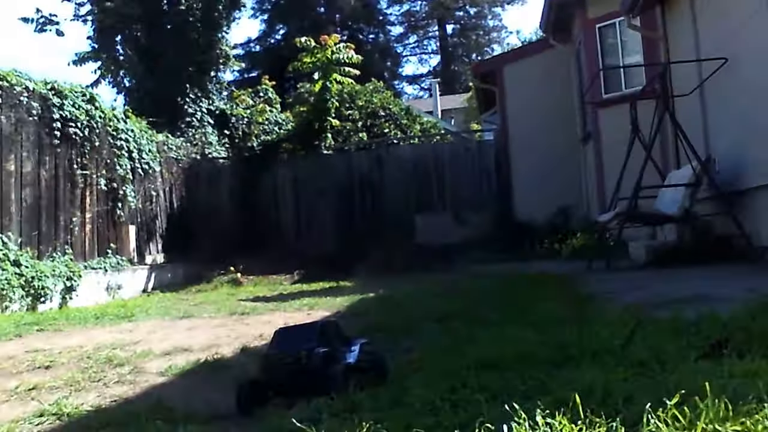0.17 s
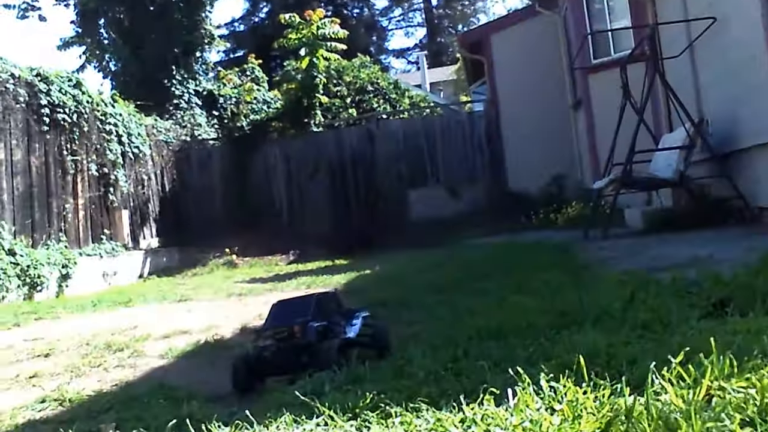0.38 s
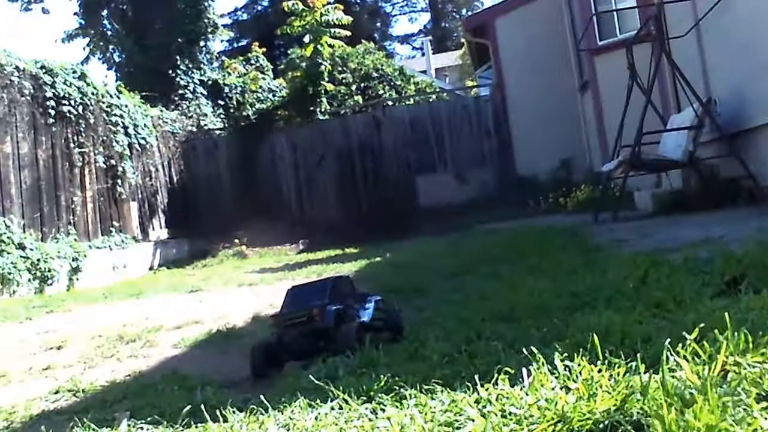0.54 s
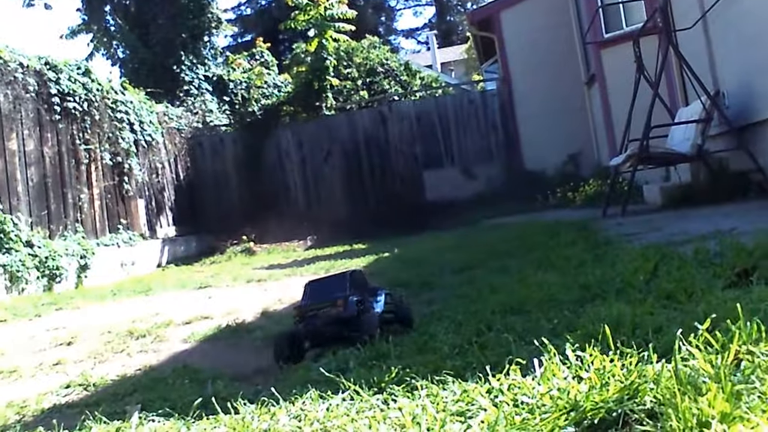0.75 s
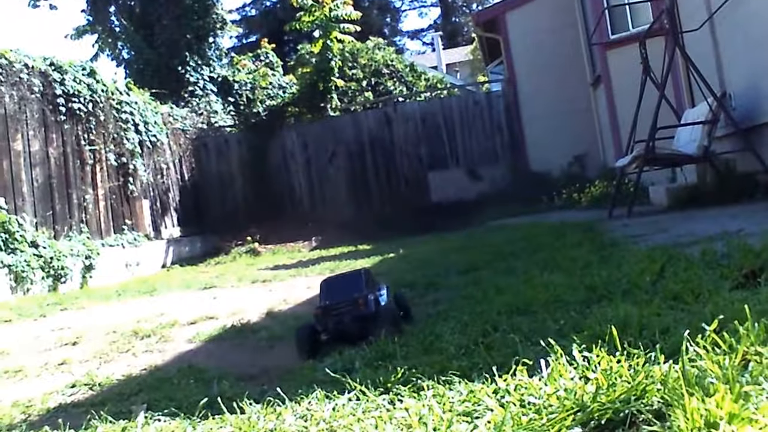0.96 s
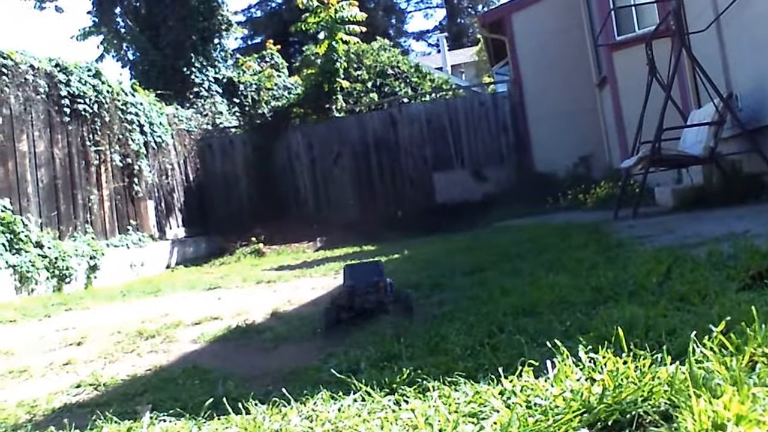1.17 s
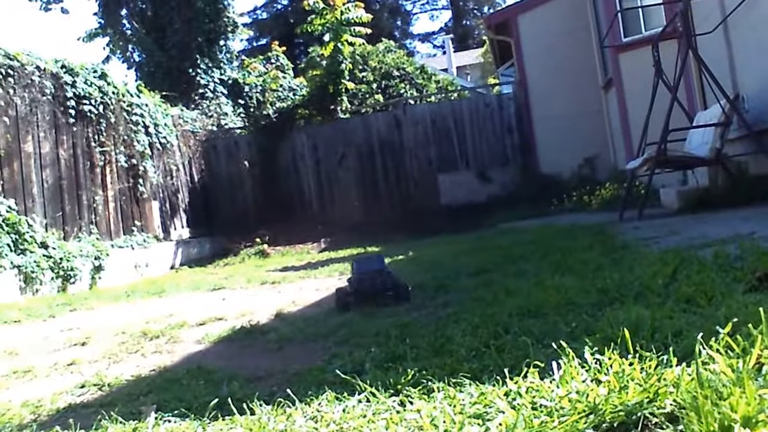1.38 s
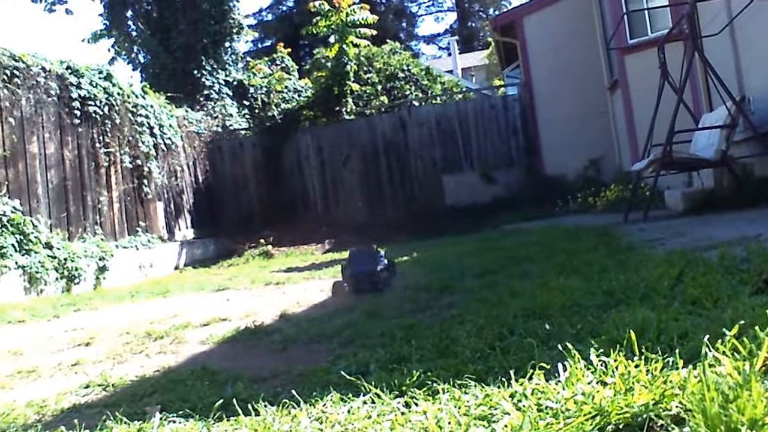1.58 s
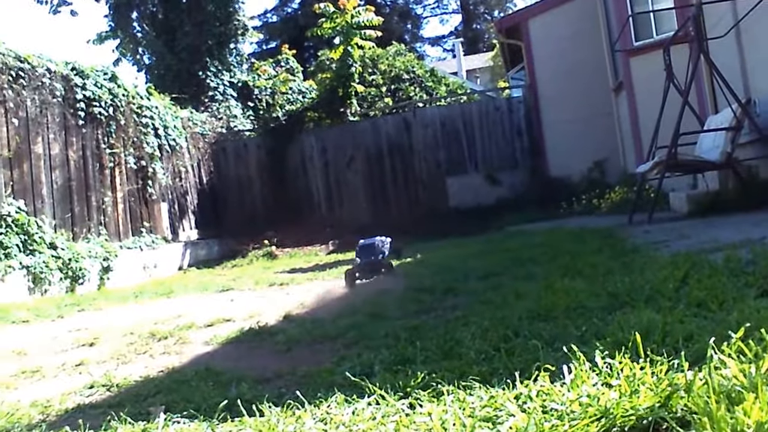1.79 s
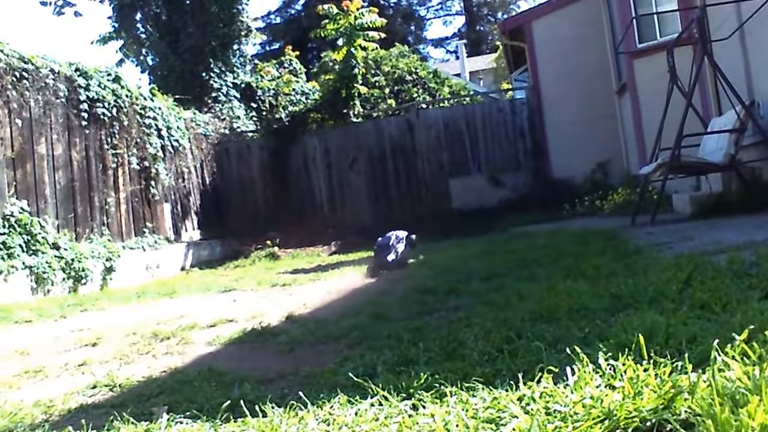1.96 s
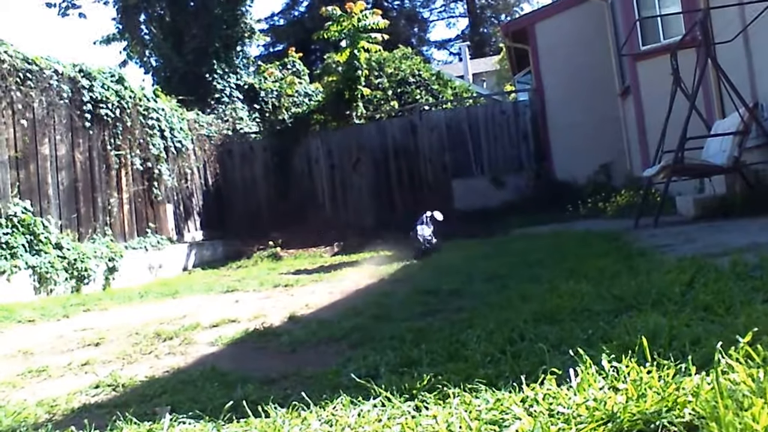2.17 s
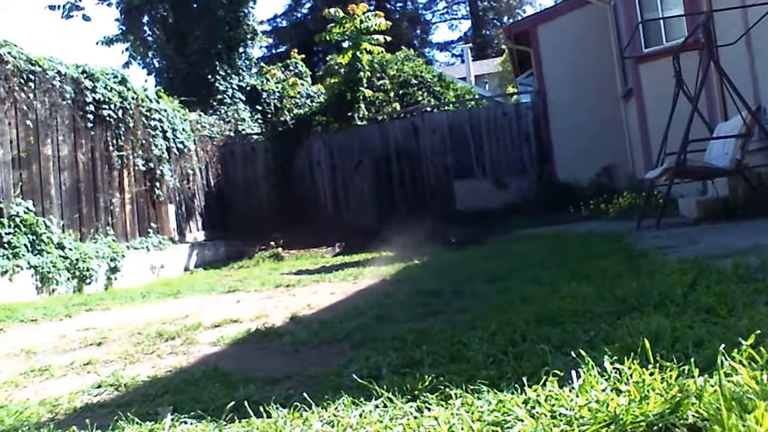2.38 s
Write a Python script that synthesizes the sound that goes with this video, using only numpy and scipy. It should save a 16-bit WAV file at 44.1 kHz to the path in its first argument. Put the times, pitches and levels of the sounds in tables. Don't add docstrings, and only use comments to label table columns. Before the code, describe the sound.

High, buzzy motor and gear whine of a radio-controlled buggy in two bursts, after grit snaps and plastic chassis rattles; it fades into the distance while wind thumps a microphone low in the grass.

```python
import sys
import numpy as np
from scipy import signal
from scipy.fft import rfft, irfft
from scipy.io import wavfile
from scipy.ndimage import uniform_filter1d

SR = 44100
rng = np.random.default_rng(int(sys.argv[2]) if len(sys.argv) > 2 else 0)


def unload_wav(signal):
    wavfile.write(
        sys.argv[1],
        SR,
        np.round(np.clip(np.atleast_2d(signal).T, -1, 1) * 32767).astype(np.int16),
    )


def amplitude_ratio(level_db):
    exponent = np.asarray(level_db, float) / 20
    return 10 ** exponent


N = 107251
TIME = np.arange(N) / SR
MESH_BLUR_HZ = 170


def unit(x):
    return x / np.sqrt(np.mean(np.abs(x) ** 2))


def band(x, hz, width_hz):
    return signal.lfilter(*signal.iirpeak(hz, hz / width_hz, SR), x)


def double_band(x, hz, width_hz):
    return band(band(x, hz, width_hz), hz, width_hz)


def colour(points, lo_hz=4.3, hi_hz=20000.):
    f, p = np.arange(1, N // 2 + 2) * SR / N, np.array(points)
    gain = amplitude_ratio(np.interp(np.log(f), np.log(p[:, 0]), p[:, 1]))
    gain = gain / np.sqrt((1 + (lo_hz / f) ** 4) * (1 + (f / hi_hz) ** 4))
    return irfft(rfft(rng.standard_normal(N)) * gain, N)


def walk(rate_hz):
    k = max(int(SR / rate_hz), 1)
    return unit(uniform_filter1d(uniform_filter1d(rng.standard_normal(N), k), k))


def curve(table, col):
    points = np.array(table)
    return np.interp(TIME, points[:, 0], points[:, col])


def line(hz, blur_hz):
    steady = .55
    wander = steady + walk(2 * blur_hz) + 1j * walk(2 * blur_hz)
    return unit(np.real(wander * np.exp(2j * np.pi * np.cumsum(hz) / SR)))


def gate(start, stop):
    edge_s = .003
    return np.clip(np.minimum(TIME - start, stop - TIME) / edge_s + .5, 0, 1)


# frequency in Hz, density in dB per Hz.
YARD_SPECTRUM = [(250, -5.5), (780, -3), (1300, -7), (2600, -11), (4700, -11.5), (6000, -13), (7500, -11.5),
                 (9000, -37.5)]


def yard():
    return amplitude_ratio(-52.5 + walk(49)) * unit(colour(YARD_SPECTRUM, lo_hz=300.))


# time in seconds, level in dB.
GUST_LEVELS = [(0.0, -41.5), (0.8, -37), (0.82, -29), (1.14, -31.5), (1.2, -25.5), (1.23, -33.5),
               (1.54, -35), (1.56, -27), (1.89, -22.5), (2.24, -30), (2.27, -25.5), (2.31, -34.5),
               (2.43, -34)]
# start in seconds, peak in dB, frequency in Hz.
WIND_BUFFETS = [(0.601, -28.5, 134), (0.826, -29.5, 70), (0.854, -24, 71), (0.839, -32.5, 152),
                (0.88, -28, 195), (0.995, -20.5, 143), (1.034, -22.5, 116), (1.14, -22.5, 169),
                (1.155, -25, 222), (1.19, -34, 128), (1.208, -37, 120), (1.29, -30.5, 150),
                (1.605, -29, 125), (1.669, -22, 124), (1.693, -15.5, 175), (1.713, -21, 240),
                (1.758, -23.5, 121), (1.818, -16.5, 120), (1.844, -18, 114), (1.866, -17, 119.4),
                (1.91, -24.5, 275), (1.959, -23.5, 207), (1.999, -21.5, 164), (2.123, -28.5, 257),
                (2.193, -31, 121), (2.249, -23, 153)]
# frequency in Hz, density in dB per Hz.
WIND_SPECTRUM = [(12, -19), (22, 0), (48, 4), (173, -3.5), (394, -17.5), (1200, -41.5), (2600, -81.5)]


def wind():
    rise_s = .005
    gust_db = curve(GUST_LEVELS, 1)
    roll = unit(colour(WIND_SPECTRUM, hi_hz=166.0)) * amplitude_ratio(2.0 * walk(54))
    edge_db = 3.87 * walk(32) - 17.5 + 0.62 * (gust_db + 39.5)
    edge = unit(colour(WIND_SPECTRUM, lo_hz=226.5)) * amplitude_ratio(edge_db)
    hits, t = np.zeros(N + 3000), np.arange(3000) / SR
    envelope = (t / rise_s) * np.exp(1 - t / rise_s)
    for s, db, hz in WIND_BUFFETS:
        rough = unit(double_band(rng.standard_normal(3000), 280, 400))
        puff = np.sin(2 * np.pi * hz * t) + 0.39 * hz / 170 * rough
        hits[int(s * SR):][:3000] += amplitude_ratio(db) * puff * envelope
    return amplitude_ratio(gust_db) * (roll + edge) + hits[:N]


# start in seconds, peak in dB, ring in Hz.
GRIT_TICKS = [
    (0.1985, -30.5, 4400),
    (0.2175, -37, 4500),
    (0.2418, -31.5, 5000),
    (0.296, -34.5, 5530),
    (0.319, -23, 5200),
    (0.3317, -30.5, 4600),
    (0.3585, -37, 4300),
    (0.3639, -19, 5000),
    (0.376, -45, 4500),
    (2.2347, -25.5, 3200),
]


def ticks():
    out, t = np.zeros(N + 900), np.arange(900) / SR
    for s, db, hz in GRIT_TICKS:
        ring = np.sin(2 * np.pi * hz * t) * np.exp(-t / 0.00028)
        hiss = 0.3 * band(rng.standard_normal(900), 3800, 2700) * np.exp(-t / 0.0017)
        body = 0.075 * np.sin(2 * np.pi * 950 * t) * np.exp(-t / 0.0038)
        out[int(s * SR):][:900] += amplitude_ratio(db) * (ring + hiss + body)
    return out[:N]


# start in seconds, peak in dB, treble in dB relative to the peak.
CHASSIS_RATTLES = [(0.494, -31.5, -15), (0.498, -35.5, -27), (0.505, -30.5, -15), (0.539, -37, -9),
                   (0.565, -41, -7), (0.596, -28.5, -9), (0.603, -31, -7), (0.612, -44, -4),
                   (0.627, -23.5, -4.5), (0.642, -24, -11), (0.66, -24, -11), (0.669, -30, -8),
                   (0.677, -24.5, -16), (0.691, -29, -15), (0.714, -26, -21), (0.725, -21.5, -7.5),
                   (0.736, -25, -9), (0.745, -29.5, -9), (0.755, -22.5, -12.5), (0.779, -25.5, -15),
                   (0.817, -40, -1), (0.961, -21.5, -2), (1.176, -25, 9), (1.195, -21.5, -7.5),
                   (1.213, -28, 5), (1.221, -24.5, -9), (1.233, -42, -2), (1.249, -33.5, 11.5),
                   (1.269, -30, 1), (1.276, -34.5, 5), (1.292, -24, -1), (1.31, -27.5, -3),
                   (1.346, -34, -1), (2.026, -37.5, 1), (2.07, -34.5, 6.5), (2.198, -51, -2.5),
                   (2.236, -26, -19), (2.282, -35, 0.5), (2.324, -34.5, 1.5)]
# frequency in Hz, width in Hz, level in dB.
CHASSIS_MODES = [(640, 245, 5), (930, 460, 4), (1490, 240, 1.5), (2140, 270, 6), (2920, 4700, -5),
                 (4300, 190, 1)]


def rattles():
    decay_s = .005
    low, high = np.zeros(N), np.zeros(N)
    for s, db, treble_db in CHASSIS_RATTLES:
        u = np.clip((TIME - s) / decay_s, 0, 40)
        envelope = amplitude_ratio(db) * np.minimum(u * 4, 1) * np.exp(-u)
        low += envelope
        high += envelope * amplitude_ratio(treble_db + 4.5)
    grain = rng.standard_normal(N) * amplitude_ratio(1.5 * walk(520))
    body = unit(sum((-1) ** k * amplitude_ratio(db) * band(grain, f, w) for k, (f, w, db) in enumerate(CHASSIS_MODES)))
    shell = unit(double_band(grain, 7400, 1500))
    return amplitude_ratio(-11.5) * (low * body + high * shell)


# start in seconds, length in seconds, frequency in Hz, level in dB.
HOUSING_HUMS = [(.91, .023, 1550, -39), (.97, .027, 2500, -41), (.998, .03, 3000, -44),
                (1.0, .06, 1600, -42), (1.11, .08, 1750, -44), (1.14, .05, 900, -45),
                (1.31, .018, 2500, -47), (1.495, .11, 700, -46), (1.495, .1, 1560, -49),
                (1.62, .3, 2000, -55), (.713, .012, 930, -44)]


def hums():
    return sum(amplitude_ratio(db) * gate(s, s + length) * line(np.full(N, hz), 70)
               for s, length, hz, db in HOUSING_HUMS)


# frequency in Hz, width in Hz, level in dB.
LAUNCH_MODES = [(900, 500, 1), (1600, 600, 3), (2500, 900, 1), (3700, 800, 0), (5400, 1000, 4)]


def launch():
    start_s, creep_s, fade_s = .897, .011, .009
    u = TIME - start_s
    crack = unit(sum(amplitude_ratio(db) * band(band(rng.standard_normal(N), f, w), f, 1.04 * w)
                     for f, w, db in LAUNCH_MODES))
    scrape = unit(band(band(rng.standard_normal(N), 5300, 1900), 5800, 2100))
    creep = amplitude_ratio(-15) * gate(start_s - creep_s, start_s) * scrape
    return amplitude_ratio(-25) * (creep + crack * (u > 0) * np.exp(-np.abs(u) / fade_s))


# time in seconds, gear mesh in Hz, whine level in dB, grind level in dB.
SPRINT_RUN = [
    (.9, 3000, -69, -68),
    (.91, 3000, -43, -41),
    (.985, 3150, -41.5, -40),
    (1.003, 3200, -31.5, -35.5),
    (1.03, 3320, -30.5, -38),
    (1.07, 3590, -30, -38.5),
    (1.12, 3720, -25.5, -39.5),
    (1.15, 3540, -28.5, -40),
    (1.172, 3350, -29, -38),
]
COAST_RUN = [
    (1.19, 3150, -33, -43),
    (1.222, 3100, -35, -44),
    (1.236, 3650, -42, -49.5),
    (1.305, 3680, -44, -51),
    (1.33, 3680, -51, -56),
    (1.385, 3723, -56, -62),
    (1.41, 3646, -47, -54),
    (1.43, 3646, -43, -48),
    (1.48, 3605, -46, -48),
]
PULL_RUN = [
    (1.488, 3000, -47, -48),
    (1.495, 3090, -31, -45),
    (1.575, 3100, -31, -45),
    (1.625, 3560, -35, -46),
    (1.69, 3540, -35, -45),
    (1.75, 3700, -34, -45),
    (1.9, 3710, -34, -46),
    (1.98, 3680, -42, -47),
]
AWAY_RUN = [
    (2.002, 3650, -41.5, -50.5),
    (2.025, 3380, -40.5, -44),
    (2.052, 2944, -37, -46),
    (2.075, 3623, -35.5, -46),
    (2.12, 3542, -41.5, -48.5),
    (2.28, 3664, -47, -51),
    (2.43, 3590, -50.5, -54.5),
]
# mesh tone in dB relative to the grind, one row per phase.
MESH_LEVELS = [-4, -30, -8.5, -15]
# gear lines in dB relative to the whine, one row per phase.
LINE_LEVELS = [-1, -12, -1, -6]
# multiple of the mesh rate, level in dB relative to the whine, blur in Hz.
MESH_ORDERS = [(1.87, -12, 350), (2, 0, 170), (2.12, -7, 260), (2.24, -8, 300), (2.38, -10, 400)]
# frequency in Hz, width in Hz, level in dB relative to the whine.
SHELL_MODES = [(7350, 550, -6.5), (7200, 1900, -7), (8100, 600, -11)]
# frequency in Hz, density in dB per Hz.
GRIND_SPECTRUM = [(400, -1), (1400, -4), (2800, -8), (4200, -11), (6000, -6), (8000, -44)]


def motor():
    runs = (SPRINT_RUN, COAST_RUN, PULL_RUN, AWAY_RUN)
    table = [tuple(row) + (mesh_db, line_db)
             for run, mesh_db, line_db in zip(runs, MESH_LEVELS, LINE_LEVELS) for row in run]
    hz = uniform_filter1d(curve(table, 1), size=200)
    shaft_hz = 89.3 * hz / 3700
    throb = 1 + 0.13 * np.sin(2 * np.pi * np.cumsum(shaft_hz) / SR)
    throb = throb * amplitude_ratio(1.5 * walk(45))
    orders = sum(amplitude_ratio(db) * line(k * hz, blur) / (1 + ((k * hz - 7200) / 1500) ** 2)
                 for k, db, blur in MESH_ORDERS)
    hiss = sum(amplitude_ratio(db) * unit(double_band(rng.standard_normal(N), f, w)) for f, w, db in SHELL_MODES)
    whine = amplitude_ratio(curve(table, 5)) * orders + hiss
    mesh = amplitude_ratio(curve(table, 4)) * line(hz, MESH_BLUR_HZ) / (1 + ((hz - 3600) / 330) ** 2)
    grind = unit(colour(GRIND_SPECTRUM, lo_hz=497.0)) * amplitude_ratio(0.68 * walk(150)) + mesh
    return throb * (amplitude_ratio(curve(table, 2) - 1.5) * whine + amplitude_ratio(curve(table, 3)) * grind)


# start in seconds,
# length in seconds, from Hz, to Hz, level in dB.
WHEEL_SPINS = [
    (.926, .024, 2100, 3300, -45),
    (.93, .016, 4500, 5600, -50),
    (.93, .034, 6500, 7900, -46),
    (1.412, .014, 1950, 2100, -51),
    (1.426, .028, 2250, 3150, -43),
    (1.423, .013, 4750, 5000, -43),
    (1.436, .035, 5300, 8300, -46.5),
    (1.474, .021, 4400, 5600, -47),
    (1.47, .025, 2200, 2800, -53),
]


def spins():
    out = np.zeros(N)
    for s, length, from_hz, to_hz, db in WHEEL_SPINS:
        u = np.clip(TIME - s, 0, length)
        hz = from_hz + (to_hz - from_hz) * u / length
        out += amplitude_ratio(db) * gate(s, s + length) * amplitude_ratio(2.5 * walk(150)) * line(hz, MESH_BLUR_HZ)
    return out


# time in seconds, frequency in Hz, level in dB.
AXLE_SONG = [
    (1.72, 3800, -64),
    (1.79, 4050, -51),
    (1.85, 4000, -56),
    (1.92, 4200, -52),
    (1.97, 4520, -51),
    (2.02, 4550, -56),
    (2.12, 4550, -66),
    (2.17, 4750, -54),
    (2.24, 4750, -57),
    (2.3, 4700, -70),
]


def axle():
    level_db = curve(AXLE_SONG, 2) + 2.7 * walk(23)
    return amplitude_ratio(level_db) * line(curve(AXLE_SONG, 1), 200) * gate(AXLE_SONG[0][0], AXLE_SONG[-1][0])


# delay in seconds, level in dB.
YARD_ECHOES = [
    (.011, -40),
    (.023, -24),
    (.045, -23),
]


def scene():
    buggy = ticks() + rattles() + hums() + launch() + motor() + spins() + axle()
    echoes = sum(amplitude_ratio(db) * np.pad(buggy, (int(s * SR), 0))[:N] for s, db in YARD_ECHOES)
    return (buggy + echoes + yard() + wind())[None]


def band_limit(x):
    return signal.sosfilt(signal.butter(12, 9220, fs=SR, output="sos"), x)


def record(dry):
    soft = signal.sosfilt(signal.butter(6, 8550, fs=SR, output="sos"), dry)
    mix = signal.sosfilt(signal.ellip(10, .3, 75, 8800, fs=SR, output="sos"), soft)
    return band_limit(mix)


dry = scene()
out = record(dry)
unload_wav(out)
```